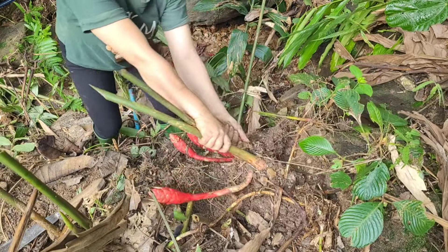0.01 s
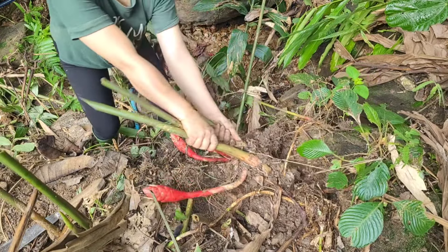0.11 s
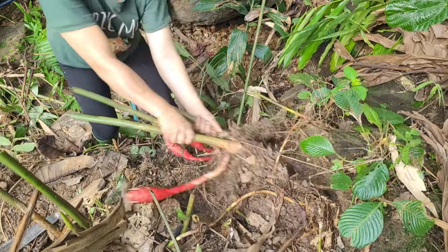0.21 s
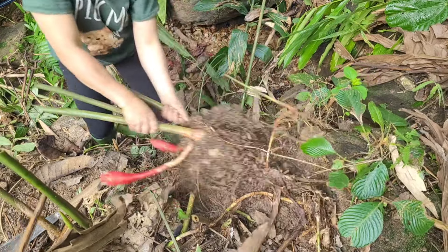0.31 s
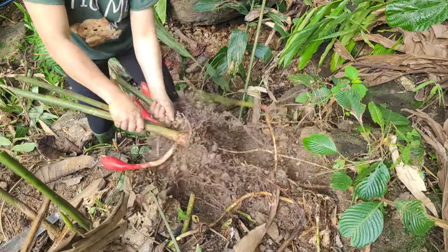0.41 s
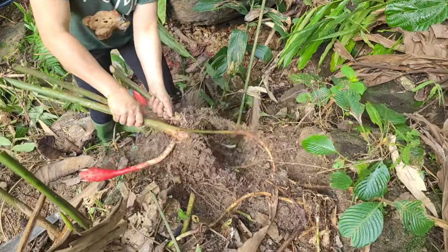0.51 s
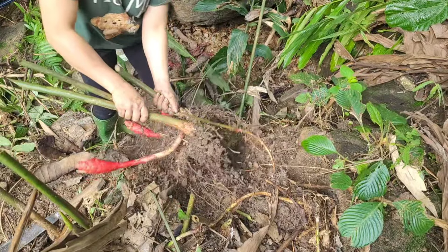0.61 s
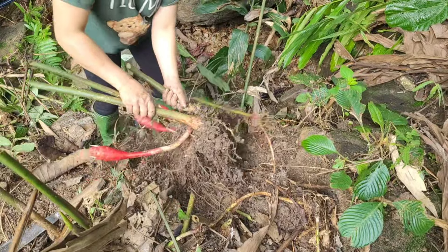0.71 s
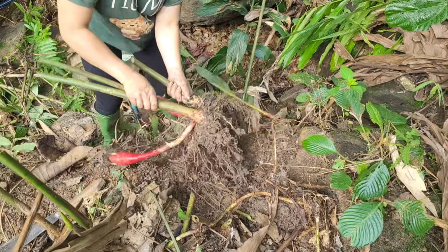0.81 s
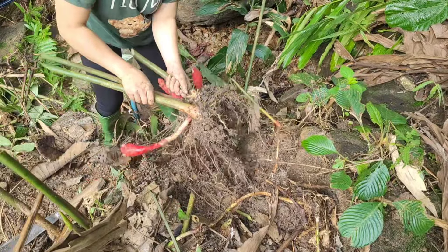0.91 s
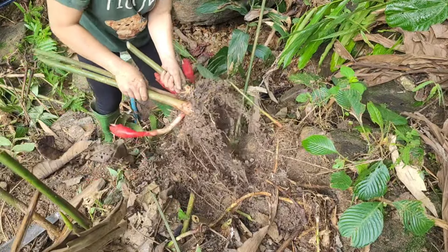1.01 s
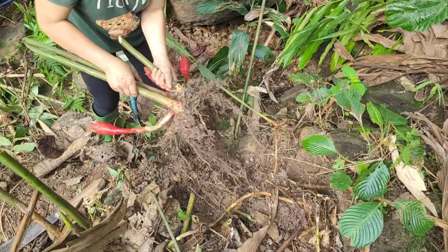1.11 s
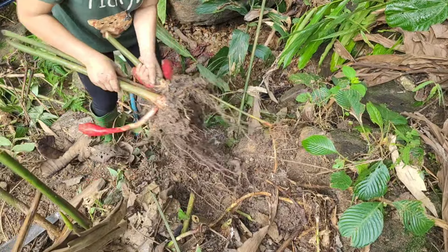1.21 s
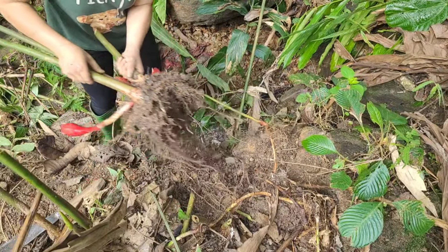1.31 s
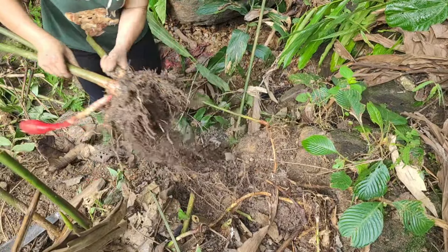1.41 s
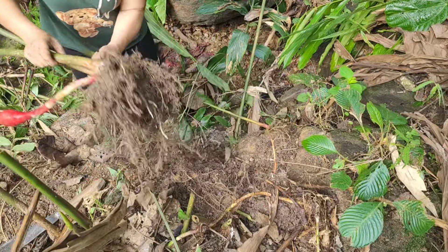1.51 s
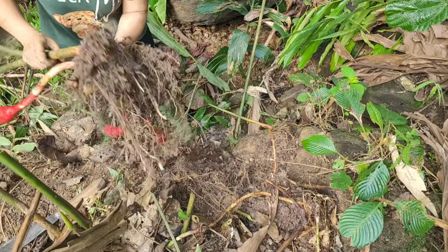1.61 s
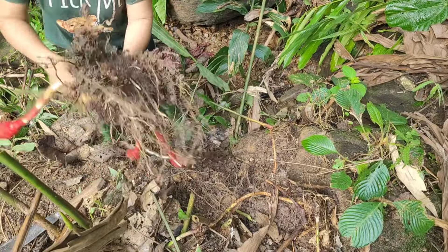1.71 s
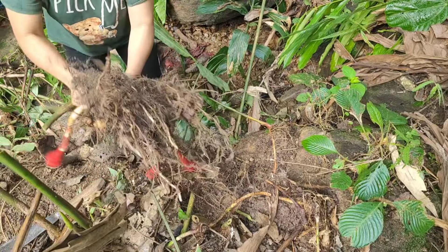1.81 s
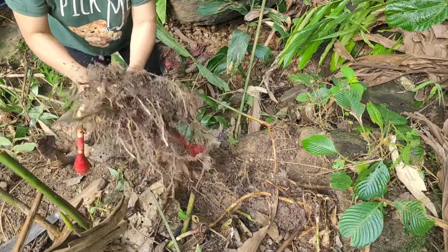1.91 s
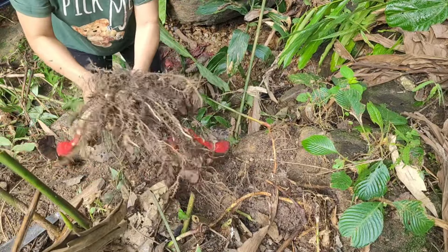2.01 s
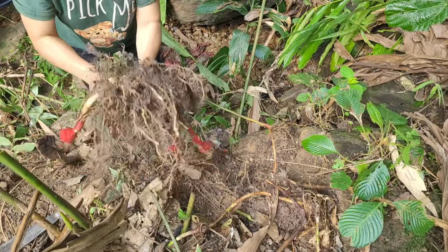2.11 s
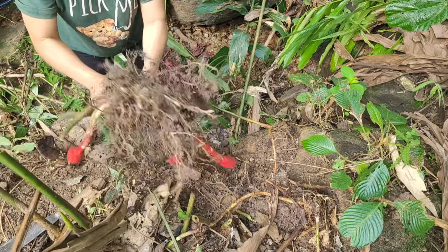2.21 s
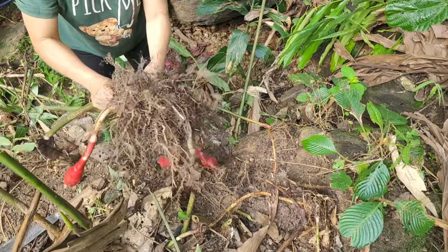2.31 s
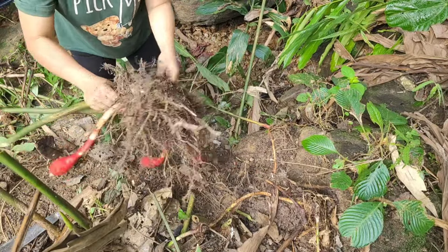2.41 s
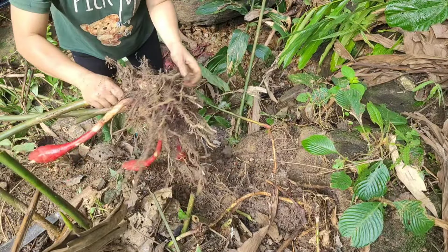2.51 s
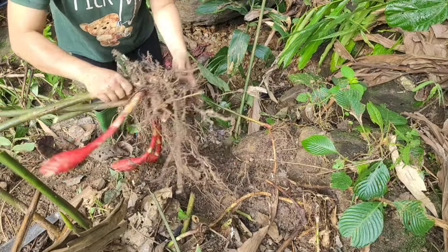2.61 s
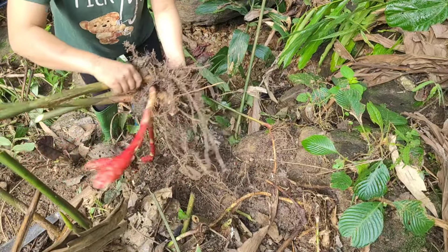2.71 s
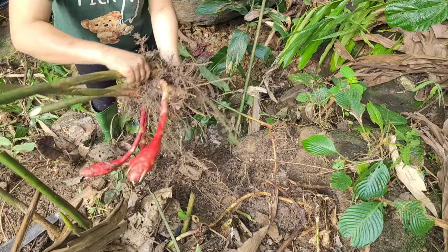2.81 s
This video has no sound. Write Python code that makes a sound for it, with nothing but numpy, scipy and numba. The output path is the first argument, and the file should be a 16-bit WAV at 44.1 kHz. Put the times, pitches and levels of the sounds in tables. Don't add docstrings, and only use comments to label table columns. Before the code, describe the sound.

A clump of plants is torn from the ground: thin roots tick, thick ones crack sharply, soil showers onto dry leaves, then sparser crumbs and twig ticks as it is shaken; close outdoor stereo phone microphone.

```python
import sys
import numpy as np
from scipy import signal
from scipy.io import wavfile
from scipy.ndimage import uniform_filter1d
from numba import njit

SR = 44100
rng = np.random.default_rng(int(sys.argv[2]) if len(sys.argv) > 2 else 0)


def convert_level_to_amplitude(level_db):
    exponent = np.asarray(level_db, float) / 20
    return 10 ** exponent


def master(y):
    cut = np.clip(np.atleast_2d(y).T, -1, 1)
    pcm = np.round(cut * 32767)
    wavfile.write(sys.argv[1], SR, pcm.astype(np.int16))


N = 127890

# [t/s, level/dB, bass against treble/dB]
SOIL_FALL = [(0, -61.5, -3.5), (.13, -53.5, 2), (.2, -50, -22), (.3, -40.5, -9), (.4, -49, -7.5),
             (.56, -45.5, -6.5), (.66, -39, -1), (.8, -38, -1.5), (.95, -38.5, -3), (1.05, -43, -2),
             (1.45, -45, -4), (1.6, -46.5, -12), (1.8, -48.5, -1.5), (2.03, -49.5, -3), (2.15, -44.5, -7),
             (2.45, -44.5, -1.5), (2.65, -46, -4.5), (2.9, -47.5, -13)]
# [f/Hz, level per Hz/dB]
SOIL_COLOUR = [(120, -8.5), (250, -4.5), (800, -2.5), (1000, -7), (1600, -4), (3500, -5.5), (8000, -7.5),
               (9200, -13), (15500, -3.5)]
PORT_LAG_S, PORT_SPREAD_S = -.00011, .00008
SNAP_RISE = 0.66


def read(table, x, col=1, log=False):
    rows = np.array(table, float)
    if log:
        return np.interp(np.log(x), np.log(rows[:, 0]), rows[:, col])
    return np.interp(x, rows[:, 0], rows[:, col])


def unit(x):
    return x / np.sqrt(np.mean(x ** 2))


def band(x, hz, width_hz):
    hz = min(hz, .42 * SR)
    return signal.lfilter(*signal.iirpeak(hz, max(hz / width_hz, .3), fs=SR), x)


def walk(rate):
    hold = int(SR / rate)
    steps = np.repeat(rng.standard_normal(N // hold + 1), hold)
    return unit(uniform_filter1d(uniform_filter1d(steps, hold), hold)[:N])


def wide(hz, count):
    mid, side = rng.standard_normal((2, count))
    share = 0.088 + 1 / (1 + (2900 / hz) ** 2)
    return (mid + np.sqrt(share) * side * np.array([[1], [-1]])) / np.sqrt(1 + share)


def coloured(spectrum, flicker_db):
    out = 0
    for hz in 30 * 2 ** np.arange(0, 9.1, .4):
        level = convert_level_to_amplitude(read(spectrum, hz, log=True) + flicker_db * walk(24))
        out = out + level * band(wide(hz, N), hz, hz / 3)
    return unit(out)


@njit
def rings(count, at, hz, cycles, size, lag, rise):
    out = np.zeros((2, count))
    for g in range(len(at)):
        s = hz[g] / SR * (2j * np.pi - np.log(1000) / 3 / cycles[g])
        turn, rise_decay = np.exp(s), np.exp(-hz[g] / SR / rise)
        for c in range(2):
            start = at[g] + (.5 - c) * lag[g]
            i = int(np.ceil(start))
            z, wait = size[g] * np.exp(s * (i - start)), 1.
            for n in range(max(i, 0), min(count, i + int(3 * cycles[g] * SR / hz[g]))):
                out[c, n] += z.imag * (1 - wait)
                z *= turn
                wait *= rise_decay
    return out


def swell(t, at, peak_s):
    age = np.maximum(t - at, 0) / peak_s
    return age * np.exp(1 - age)


def forest():
    # [f/Hz, level per Hz/dB]
    leaf_colour = [(88, -56), (150, -30), (404, -15), (6600, -1), (7270, -37), (15500, -7)]
    leaf_db, insect_db, insect_hz, insect_width_hz = -57.5, -59, 7360, 830
    insects = band(wide(insect_hz, N), insect_hz, insect_width_hz)
    insects = unit(band(insects, insect_hz, insect_width_hz))
    return convert_level_to_amplitude(leaf_db) * coloured(leaf_colour, 0.62) + convert_level_to_amplitude(insect_db + 0.5 * walk(5.5)) * insects


def rumble(t):
    # [t/s, level/dB, fade/s]
    tugs = [
        (.22, -60, 0.044),
        (.46, -73, 0.047),
        (.62, -68, 0.028),
        (.78, -72.5, 0.09),
        (1.0, -93, 0.068),
        (2.08, -79.5, 0.055),
        (2.5, -74, 0.03),
    ]
    rumble_hz, width_hz, floor_db = 67.6, 60, -82.5
    mid, side = (unit(band(band(rng.standard_normal(N), rumble_hz, width_hz), rumble_hz, width_hz))
                 for _ in range(2))
    size = convert_level_to_amplitude(floor_db) + sum(convert_level_to_amplitude(db) * swell(t, at, fade) for at, db, fade in tugs)
    return size * (mid * np.array([[.85], [1.15]]) + 0.43 * side * np.array([[1], [-1]]))


def crumbs(count, scatter_db):
    place, pitch, chance = rng.random((count, 3)).T
    extra = np.minimum(rng.exponential(size=count), 7.3)
    direction = rng.standard_normal(count)
    hz = 100 * 150 ** (pitch ** .6)
    scatter = scatter_db * extra / (1 + (hz / 5000) ** 2)
    size = convert_level_to_amplitude(read(SOIL_COLOUR, hz, log=True) + scatter) * hz ** 1.153 * np.sign(chance - .5)
    lag = (PORT_LAG_S + PORT_SPREAD_S * direction) * SR
    return rings(N, place * N, hz, 2.56 * (.5 + chance), size, lag, 0.25)


def shower(t):
    dust_db, flicker_db, split_hz = -1.5, 1.0, 1200
    soil = unit(crumbs(count=40000, scatter_db=3)) + convert_level_to_amplitude(dust_db) * coloured(SOIL_COLOUR, flicker_db)
    low = signal.sosfilt(signal.butter(1, split_hz, fs=SR, output="sos"), soil)
    high = soil - low
    level_db, coarse_db = read(SOIL_FALL, t), read(SOIL_FALL, t, col=2)
    return unit(high) * convert_level_to_amplitude(level_db) + low / np.std(high) * convert_level_to_amplitude(level_db + coarse_db)


def pebbles(t):
    count, middle_hz, spread, cycles, level_db = 1200, 1305, 0.507, 6.0, -5
    place, chance = rng.random((count, 2)).T
    pitch_draw, direction = rng.standard_normal((count, 2)).T
    pitch = np.exp(spread * pitch_draw)
    size = convert_level_to_amplitude(-4.5 * np.log(chance + .06)) * np.sqrt(pitch)
    lag = (PORT_LAG_S + PORT_SPREAD_S * direction / 2) * SR
    taps = rings(N, place * N, middle_hz * pitch, np.full(count, cycles), size, lag, SNAP_RISE)
    return unit(taps) * convert_level_to_amplitude(read(SOIL_FALL, t) + read(SOIL_FALL, t, col=2) + level_db)


def snaps(rows, t, delay_s, crack_db, tail_db, tail_s, rise):
    rows = np.array(rows, float)
    at, db, hz = rows[:, 0] + delay_s, rows[:, 1], rows[:, 2]
    cycles = rows[:, 3] if rows.shape[1] > 3 else np.full(len(at), 5.0)
    lag = PORT_LAG_S * SR * np.minimum(2500 / hz, 1)
    out = rings(N, at * SR, hz, cycles, convert_level_to_amplitude(db), lag, rise)
    crack_hz, crack_width_hz, crack_s = 6000, 4300, 0.00073
    age = t[:2000]
    for a, d, f in zip((at * SR).astype(int), db, hz):
        crack = unit(band(wide(1800.0, len(age)), crack_hz, crack_width_hz))
        crack = crack * np.exp(-age / crack_s) * convert_level_to_amplitude(crack_db)
        tail = unit(band(wide(f, len(age)), f, 0.93 * f))
        tail = tail * np.exp(-age / tail_s * (f / 1500) ** 0.66) * convert_level_to_amplitude(tail_db)
        out[:, a:a + len(age)] += (convert_level_to_amplitude(d) * (crack + tail))[:, :N - a]
    return out


def thin_roots_and_twigs(t):
    # [t/s, peak level/dB, ring f/Hz]
    thin_roots = [(.069, -53, 600), (.093, -44.5, 626), (.121, -44, 660), (.125, -48, 400),
                  (.134, -31.5, 2450), (.192, -36, 960), (.193, -36, 1960), (.203, -46, 790),
                  (.287, -33, 600), (.297, -47, 1600), (.425, -40, 1430), (.4255, -32, 2600),
                  (.479, -42, 570), (.492, -37, 373), (.504, -47, 455), (.51, -33, 1420),
                  (.513, -26.5, 2500), (.524, -33, 600), (.526, -32, 1650), (.555, -44, 2100),
                  (.597, -38, 1600), (.735, -32, 1700), (.774, -19, 1820), (.787, -21, 5700),
                  (.801, -31, 1520), (.84, -30, 1990), (.853, -29, 1590), (.898, -26, 1860),
                  (.907, -25, 1500), (.995, -22, 2400), (1.0003, -16, 2300), (1.006, -23, 2660),
                  (.999, -26.5, 625)]
    # [t/s, peak level/dB, ring f/Hz]
    litter_ticks = [(1.26, -32.5, 650), (1.273, -18.5, 4300), (1.306, -26.5, 2400), (1.373, -28, 1640),
                    (1.43, -35, 810), (1.342, -31.5, 1370), (1.431, -24, 4600), (1.105, -36.5, 695),
                    (1.76, -42, 1700), (1.91, -38, 860), (2.155, -38, 2650), (2.174, -35.5, 918),
                    (2.241, -41, 1140), (2.411, -33, 1360), (2.601, -31.5, 2150), (2.723, -32.5, 1750),
                    (2.86, -30.5, 2220), (1.526, -30, 1370), (1.619, -40, 1570), (1.672, -34.5, 724),
                    (1.699, -40.5, 402), (1.884, -26.5, 1560), (2.045, -37, 850), (2.053, -27, 2380),
                    (2.08, -22, 6550), (2.314, -36, 1480), (2.358, -30, 630), (2.437, -35.5, 810),
                    (2.466, -30.5, 1610), (2.544, -29.5, 1210), (2.575, -23.5, 5560), (2.623, -25, 2140),
                    (2.772, -33, 1110)]
    return snaps(thin_roots + litter_ticks, t, delay_s=0.001185, crack_db=-22.5, tail_db=-15,
                 tail_s=.005, rise=SNAP_RISE)


def flicks(t):
    # [t/s, fade/s, level/dB, centre f/Hz, width over centre]
    leaf_flicks = [(.135, 0.0017, -32.5, 5460, 0.64), (.591, .004, -35, 12000, 1),
                   (.604, 0.019, -36, 8700, 1), (0.763, .0008, -24, 11000, 0.72),
                   (.795, 0.022, -34, 11500, 0.67), (.852, .006, -29.5, 8600, .9),
                   (0.922, 0.0037, -28.5, 7060, .5), (0.926, .004, -30, 8350, .4),
                   (0.949, .003, -34, 12500, .3), (1.407, .0015, -36, 11100, .5),
                   (1.462, .012, -38, 8000, .3), (1.5247, 0.0043, -41, 7300, 0.98),
                   (1.722, 0.011, -42.5, 9000, .3), (2.0475, .002, -39.5, 7800, 0.57),
                   (2.0805, 0.041, -41, 10100, 1), (2.2386, .002, -40, 14000, .4),
                   (2.264, .02, -45, 11000, 0.7), (2.314, .014, -36.5, 11500, 0.73),
                   (2.35, .004, -38, 10000, .7), (2.3888, .002, -33, 12500, 0.79),
                   (2.498, .012, -52, 10000, .9), (2.573, 0.01, -37, 9600, 1),
                   (2.747, .015, -50, 11000, .9), (2.8113, 0.0028, -35.5, 10900, .7)]
    rise_s = 0.00049
    out, age = np.zeros((2, N)), t[:6000]
    for at, fade, db, hz, width in leaf_flicks:
        a = int(at * SR)
        hiss = unit(band(band(wide(hz, len(age)), hz, width * hz), hz, width * hz))
        shape = (1 - np.exp(-age / rise_s)) * np.exp(-age / fade)
        out[:, a:a + len(age)] += (convert_level_to_amplitude(db) * hiss * shape)[:, :N - a]
    return out


def thick_roots(t):
    # [t/s, peak level/dB, ring f/Hz, decay/cycles]
    wood_rings = [(.2212, -16.5, 1530, 3.8), (.2212, -25, 4530, 7.9), (.222, -20, 594, 4),
                  (.2212, -22.5, 350, 1.2), (.2442, -17, 6270, 4.2), (.2511, -13.5, 7140, 6.5),
                  (.2512, -17, 302, 1.6), (.2555, -36, 7000, 5), (.2584, -17, 1750, 3.6),
                  (.2592, -19.5, 604, 4), (.2603, -14, 5000, 9.3), (.2625, -17, 2070, 5.3),
                  (.2685, -17, 5040, 4.7), (.2708, -9.5, 4450, 0.53), (.307, -21, 5100, 1.1),
                  (.3252, -10, 5600, 7.1), (.3256, -14.5, 1560, 2.9), (.3257, -14, 2590, 5),
                  (.3268, -25, 347, 1.84)]
    return snaps(wood_rings, t, delay_s=0, crack_db=-19.5, tail_db=-16.0, tail_s=0.0055, rise=0.25)


def swishes(t):
    # [t/s, fade/s, level/dB, centre f/Hz]
    handfuls = [(0.252, 0.027, -35.5, 3320), (0.327, 0.018, -35.5, 1580), (0.49, 0.16, -46.5, 666),
                (0.703, 0.0044, -28, 1850), (0.602, 0.072, -36, 6960), (0.772, 0.09, -31, 2270),
                (0.852, 0.0044, -31, 2500), (0.906, 0.044, -36, 4050), (0.992, 0.021, -32, 1780),
                (1.266, 0.021, -44, 2980), (1.671, 0.072, -45, 2640), (1.612, 0.02, -42.5, 1520),
                (1.806, 0.016, -40.5, 1730), (2.079, 0.071, -42, 6000), (2.088, 0.031, -43, 1400),
                (2.257, 0.053, -41.5, 3160), (2.312, 0.05, -42.5, 6000), (2.429, 0.025, -39.5, 1510),
                (2.498, 0.022, -37, 4470), (2.732, 0.056, -44, 2010)]
    out, rain = np.zeros((2, N)), unit(crumbs(count=30000, scatter_db=3))
    for at, fade, db, hz in handfuls:
        a = int(at * SR)
        age = t[:min(N - a, int(.3 * SR))]
        shape = (1 - np.exp(-age / 0.04 / fade)) * np.exp(-age / fade)
        fall = unit(band(rain[:, a:a + len(age)], hz, 2.33 * hz))
        out[:, a:a + len(age)] += convert_level_to_amplitude(db) * shape * fall
    return out


def thuds(t):
    # [t/s, level/dB, thud f/Hz, ring/s]
    clods = [
        (0.253, -43, 305, 0.033),
        (0.327, -54, 346, 0.022),
        (0.491, -57, 314, 0.11),
        (0.79, -50, 258, 0.057),
        (1.27, -51, 210, 0.038),
        (1.815, -58, 240, 0.079),
        (2.096, -52.5, 257, 0.057),
        (2.25, -55.5, 250, 0.18),
        (2.577, -55.5, 241, 0.13),
    ]
    out = np.zeros((2, N))
    for at, db, hz, ring in clods:
        out += convert_level_to_amplitude(db) * unit(band(wide(hz, N), hz, 0.43 * hz)) * swell(t, at, ring / 8)
    return out


def heave(t):
    age, heave_hz, level_db, half_s = t - .295, 57, -48, 0.023
    pulse = np.exp(-(age / half_s) ** 2) * np.sin(2 * np.pi * heave_hz * age)
    return convert_level_to_amplitude(level_db) * pulse * np.array([[.85], [1.15]])


def twang(t):
    # [t/s, pitch f/Hz, level/dB]
    slackening = [
        (.632, 442.7, -53),
        (.643, 425, -41),
        (.652, 395, -41),
        (.658, 373, -28.5),
        (.665, 279, -39),
        (.676, 238, -39.5),
        (.7, 232, -42),
        (.716, 232, -65),
    ]
    octave_db, rough_db = -13, 3.5
    phase = 2 * np.pi * np.cumsum(read(slackening, t)) / SR
    on = (t > slackening[0][0]) & (t < slackening[-1][0])
    octave = convert_level_to_amplitude(octave_db) * (t > slackening[3][0]) * np.sin(2 * phase)
    level = convert_level_to_amplitude(read(slackening, t, col=2) + rough_db * walk(300))
    return np.sqrt(2) * on * level * (np.sin(phase) + octave)


def litter_colour(air):
    # [f/Hz, width/Hz, share added]
    hollow_bands = [(238, 38, 0.35), (600, 20, 0.13), (810, 27, 0.3), (1370, 31, 0.25), (1650, 30, 0.27),
                    (1834, 26, 0.21), (2100, 40, 0.19)]
    dip_hz, dip_width_hz, dip_share = 967, 126, 0.43
    added = sum(share * band(air, hz, width) for hz, width, share in hollow_bands)
    return air - dip_share * band(air, dip_hz, dip_width_hz) + added


def scene():
    t = np.arange(N) / SR
    air = forest() + shower(t) + pebbles(t) + thin_roots_and_twigs(t) + flicks(t)
    air = air + thick_roots(t) + swishes(t) + thuds(t) + twang(t)
    low_cut = signal.butter(3, 145, "high", fs=SR, output="sos")
    return signal.sosfilt(low_cut, litter_colour(air)) + rumble(t) + heave(t)


def low_pass(x):
    return signal.sosfilt(signal.butter(12, 15520, fs=SR, output="sos"), x)


def record(dry):
    treble_pan_db, bass_pan_db = 1.9, -1.0
    dry = signal.sosfilt(signal.ellip(8, .2, 60, 15900, fs=SR, output="sos"), dry)
    low = signal.sosfiltfilt(signal.butter(3, 6500, fs=SR, output="sos"), dry)
    side = np.array([[.5], [-.5]])
    mix = low * convert_level_to_amplitude(bass_pan_db * side) + (dry - low) * convert_level_to_amplitude(treble_pan_db * side)
    return low_pass(mix)


dry = scene()
out = record(dry)
master(out)
```